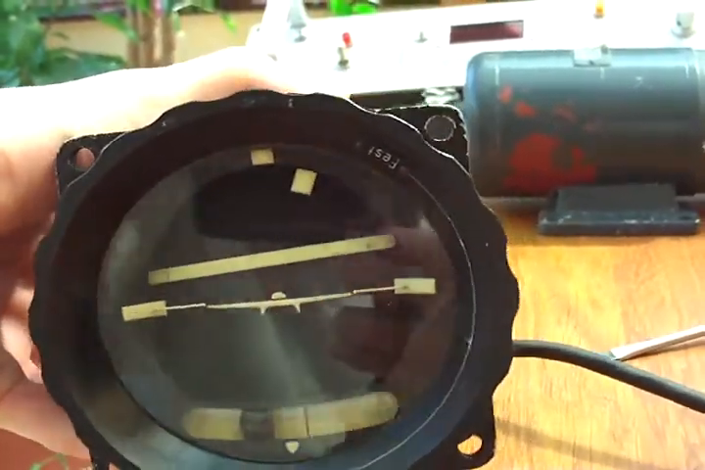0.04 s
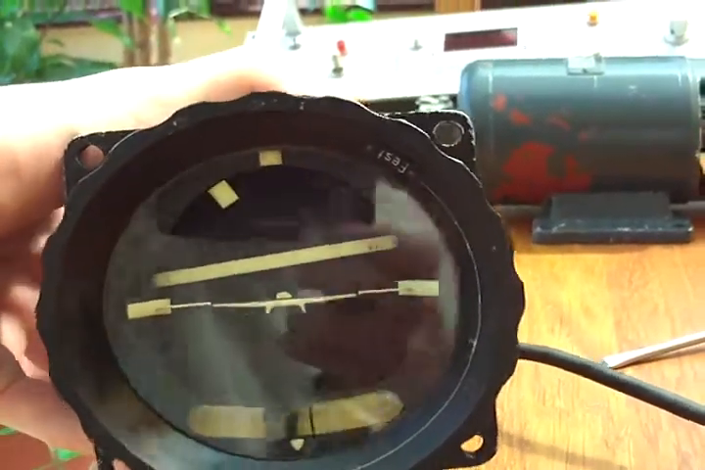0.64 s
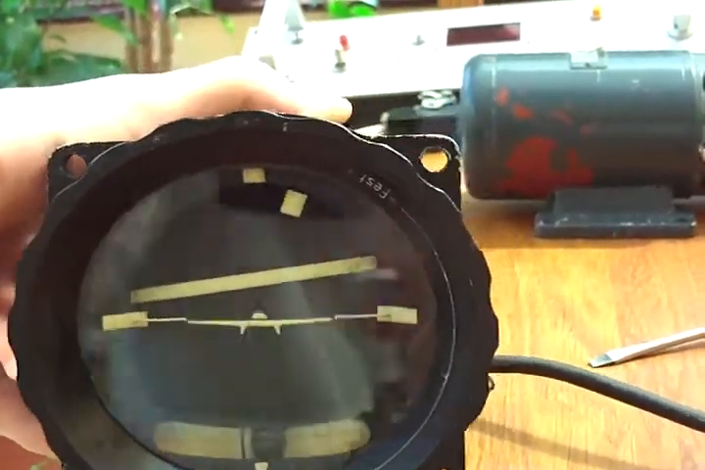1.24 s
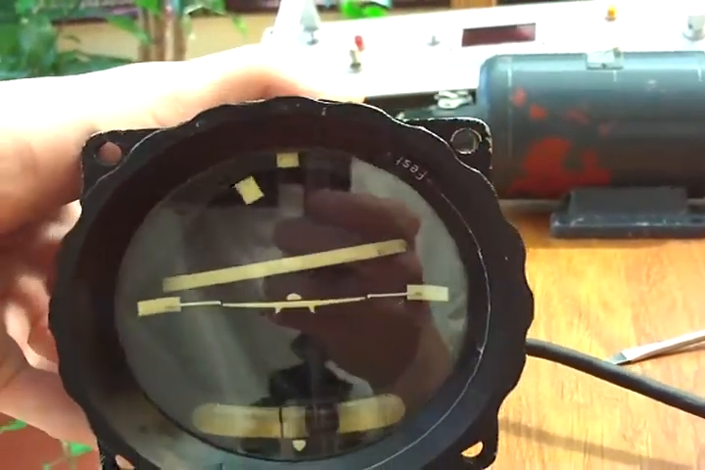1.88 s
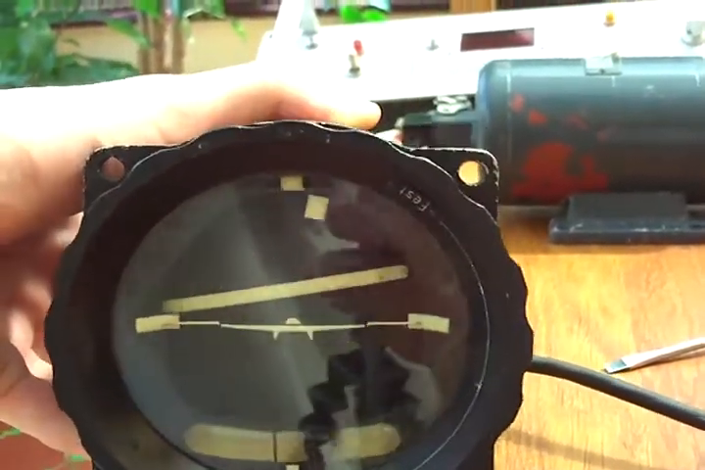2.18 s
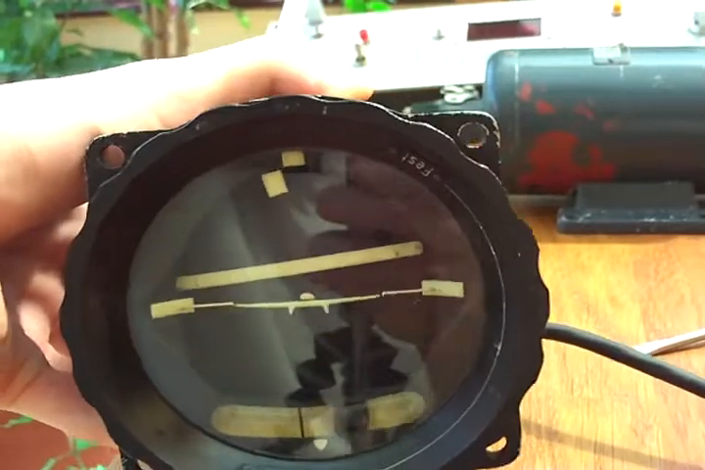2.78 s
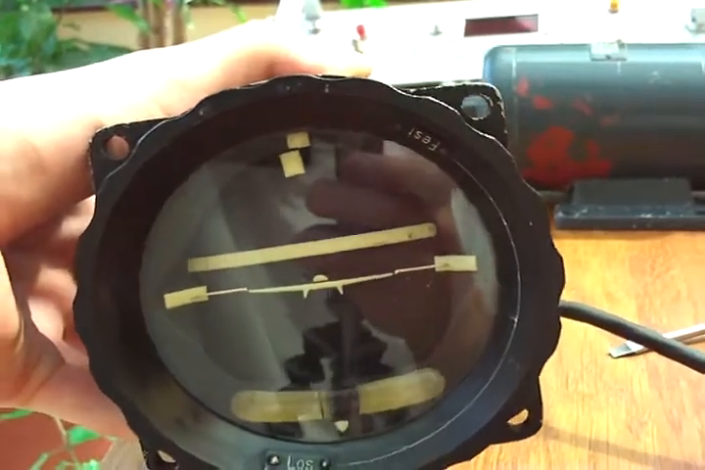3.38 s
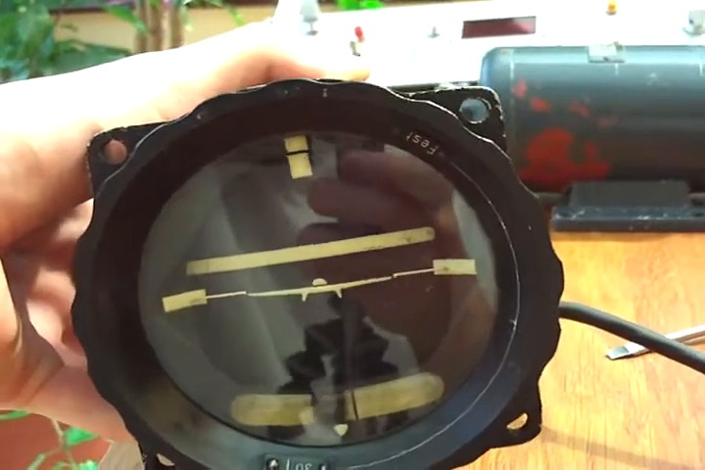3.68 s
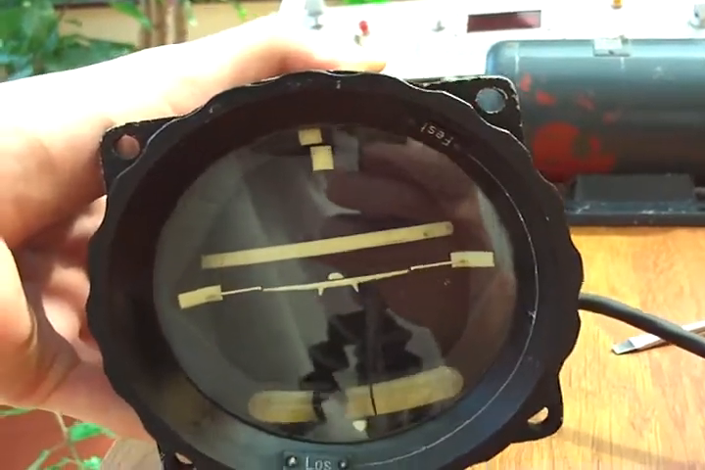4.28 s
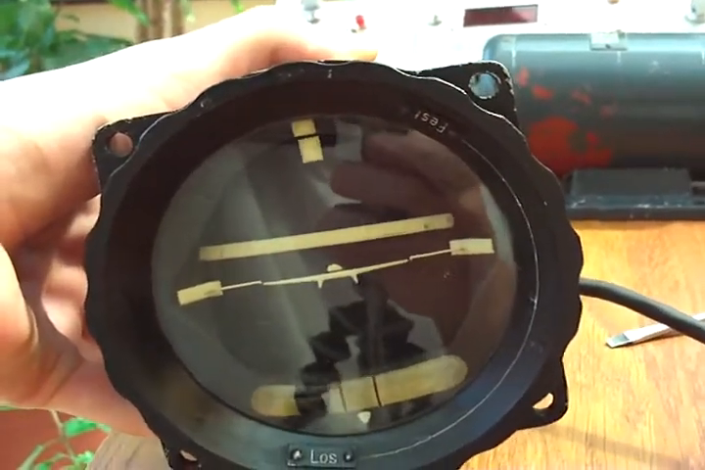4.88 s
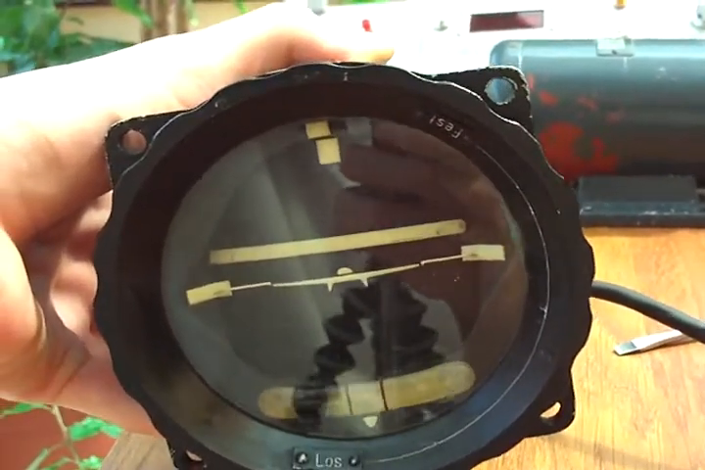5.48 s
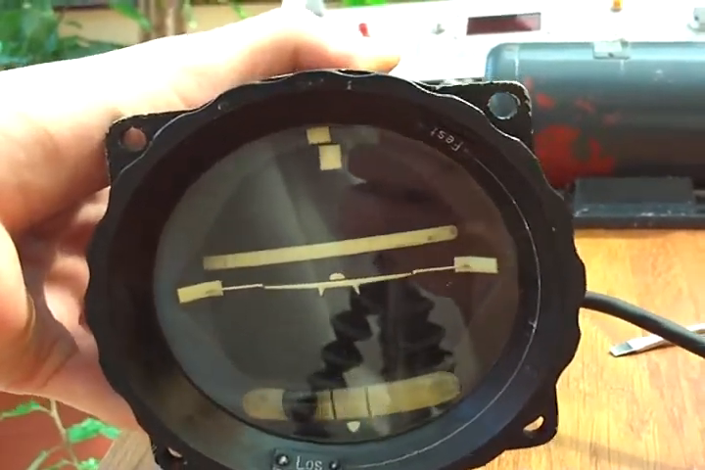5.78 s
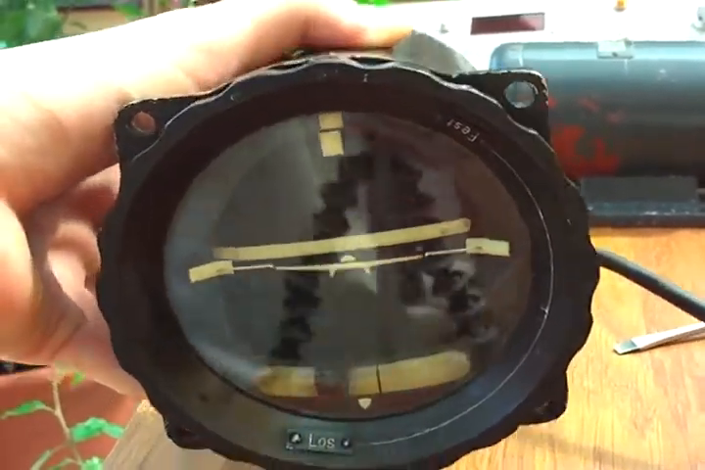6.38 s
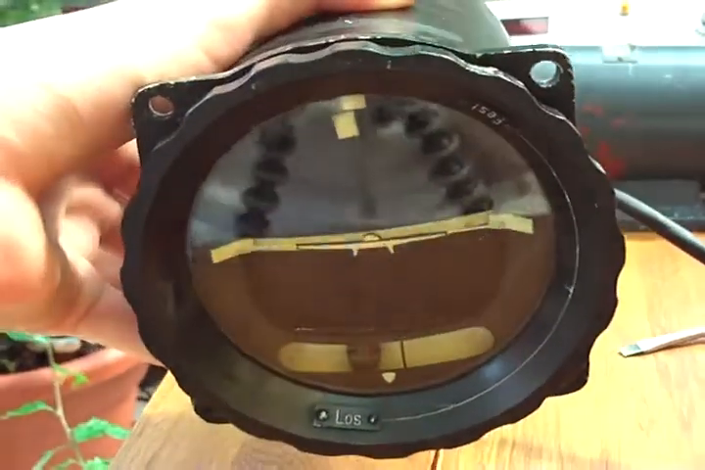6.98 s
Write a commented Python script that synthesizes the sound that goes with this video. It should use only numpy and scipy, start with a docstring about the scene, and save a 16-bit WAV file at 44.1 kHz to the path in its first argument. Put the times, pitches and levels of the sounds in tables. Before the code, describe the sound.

Already spinning at full speed, a gyroscope and its power unit give a steady, pulsing hum with a metallic rolling whirr and a faint high whine, heard close up indoors. At first the whirr comes in quick, hissy surges, which later grow rare. A short low boom rises from a bearing after about two seconds, returns twice, and comes once more at the very end.

```python
"""Close on an aircraft gyro horizon held above a table, in mono; a small rotary converter feeds it.
It is at full speed from the start: the spinning parts hum at about 125 turns a second, their overtones
throb three to four times a second, and rolling bearings fill the metal cases under a thin whine.
For three seconds the bearing noise surges again and again, then the surges grow rare.
A ball race booms at 2.3 s, again around 3.5 and 5.8 s, and once more at the very end."""
import sys
import numpy as np
from scipy import signal
from scipy.fft import rfft, irfft, next_fast_len
from scipy.io import wavfile
from scipy.ndimage import uniform_filter1d

SR = 44100
rng = np.random.default_rng(int(sys.argv[2]) if len(sys.argv) > 2 else 0)


def dump(signal):
    """Clip the signal to [-1, 1] and save it as 16-bit WAV at the path in sys.argv[1]."""
    limited = np.clip(np.atleast_2d(signal).T, -1, 1)
    pcm = np.round(limited * 32767).astype(np.int16)
    wavfile.write(sys.argv[1], SR, pcm)


N = 314874


def from_db(db):
    """Decibels to gain."""
    return 10 ** (np.asarray(db) / 20)


def in_time(rows):
    """A curve of (time_s, value) rows at every sample."""
    return np.interp(np.arange(N) / SR, *np.transpose(rows))


def bump(crest_s, half_s):
    """A smooth swell of height 1."""
    return np.exp(-((np.arange(N) / SR - crest_s) / half_s) ** 2)


def trend(db_per_s):
    """A steady change of level in dB, zero halfway through."""
    return db_per_s * (np.arange(N) - N / 2) / SR


def drift(rate_hz):
    """Slow chance: smoothed noise of spread 1."""
    hop, settle = 100, 2000
    pole = np.exp(-2 * np.pi * rate_hz * hop / SR)
    noise = rng.standard_normal(N // hop + settle + 2)
    slow = signal.lfilter([1], [1, -2 * pole, pole * pole], noise)[settle:]
    return np.interp(np.arange(N) / hop, np.arange(len(slow)), slow / slow.std())


def tone(cycles, level_db, waver, waver_hz):
    """A sine of given rms level; the share `waver` of it wanders in strength and phase."""
    angle = 2 * np.pi * cycles
    in_phase = np.sqrt(2 * (1 - waver ** 2)) + waver * drift(waver_hz)
    quadrature = waver * drift(waver_hz)
    return from_db(level_db) * (in_phase * np.cos(angle) + quadrature * np.sin(angle))


def evened(noise, window_s=0.18):
    """Noise held to a steady level over long stretches; its quick flutter stays."""
    power = noise ** 2
    for _ in range(2):
        power = uniform_filter1d(power, int(window_s * SR))
    return noise * np.sqrt(np.mean(noise ** 2) / (np.abs(power) + 1e-20))


def rotation(turn_hz=124.75):
    """Turns made so far; the speed gives a little as the hand moves the case."""
    # departure from the turning rate: time_s, offset_hz
    speed = [(0, .03), (.5, .17), (1.05, -.14), (1.5, .2), (1.85, .12), (2.08, -.15), (2.7, -.15),
             (3.1, -.04), (3.75, -.03), (4.15, .28), (4.6, .08), (5.25, .07), (5.7, .2), (6.25, -.14),
             (6.65, .06), (7.14, .12)]
    return np.cumsum(turn_hz + in_time(speed)) / SR


def hum(turns, quick_hz=4.245, slow_hz=3.437):
    """Unbalance gives a firm fundamental; side tones at two spacings make the overtones throb."""
    # harmonics of the rotation and their side tones: multiple, quick_steps, slow_steps, level_db
    partials = [(1, 0, 0, -21), (1, -1, 0, -39.5), (1, 1, 0, -49), (2, 0, 0, -24.5), (2, -1, 0, -30),
                (2, -2, 0, -38), (2, 2, 0, -36), (2, 0, -1, -36.5), (2, 0, -2, -37), (2, 0, 1, -44.5),
                (3, 0, 0, -33), (3, -1, 0, -25), (3, 1, 0, -32.5), (3, -2, 0, -44), (3, 0, -1, -38.5),
                (4, 0, 0, -38), (4, -1, 0, -34.5), (4, 1, 0, -28), (4, -2, 0, -44.5), (4, 0, -1, -30),
                (4, 0, -2, -26.5), (5, -1, 0, -32.5), (5, 1, 0, -37.5), (5, 2, 0, -36.5), (5, 0, -1, -33.5),
                (5, 0, -2, -37), (6, 0, 0, -35.5), (6, -1, 0, -37), (7, 0, 0, -26.5), (7, -1, 0, -42.5),
                (7, 0, -1, -38.5), (8, 0, 0, -40), (11, 0, 0, -40), (14, 0, 0, -39)]
    # timing of each overtone's two throbs: multiple, quick_crest_s, slow_crest_s
    throbs = [(2, .141, .243), (3, .007, .233), (4, .059, .104), (5, .063, .098), (6, .19, .34),
              (7, .212, .04)]
    # the quick throb runs a little early or late: time_s, lead_s
    quick_lead = [(0, 0.025), (1.8, -0.015), (3.2, 0.0096), (5.1, -0.019), (6.8, 0.022)]
    t, out = np.arange(N) / SR, np.zeros(N)
    quick_t = t + in_time(quick_lead)
    crests = {multiple: times for multiple, *times in throbs}
    start_cycles = rng.random(size=20)
    for multiple, quick_steps, slow_steps, level_db in partials:
        quick_s, slow_s = crests.get(multiple, (0, 0))
        cycles = start_cycles[multiple] + multiple * turns
        cycles += quick_steps * quick_hz * (quick_t - quick_s)
        cycles += slow_steps * slow_hz * (t - slow_s)
        if quick_steps + slow_steps > 0:
            cycles += 0.68   # upper side tones partly oppose the lower, so a throb wobbles the pitch
        if multiple == 1:
            out += tone(cycles, level_db, waver=0.076, waver_hz=3.4)
        else:
            out += tone(cycles, level_db, waver=0.16, waver_hz=1.6)
    return out


def case_gain(hz):
    """The metal cases colour the bearing noise: a broad slope with narrow modes on it."""
    # broad spectrum of the rolling noise: frequency_hz, density_db
    rolling = [(12, -67), (33, -47.5), (62, -61), (130, -58.5), (230, -60.5), (350, -49.5), (600, -54),
               (1000, -49.5), (1400, -63.5), (2200, -66.5), (3400, -73.5), (4400, -72.5), (5600, -79.5),
               (7100, -98)]
    # resonances and dips of the cases: centre_hz, width_hz, gain_db
    case_modes = [(82, 4.1, 7.5), (163.7, 13, 16), (192.8, 10, 13.5), (244.5, 24, 11), (275, 15, 6),
                  (328.5, 12, 8.5), (419, 12, 3.5), (425, 11, 4.5), (456.7, 10, 9), (481.7, 16, 8),
                  (503, 30, 7.5), (545, 14, 8), (592, 13, 11), (619, 17, 8), (645, 25, 8.5),
                  (700, 16.5, 13), (718, 11, 5.5), (752.6, 15, 10), (871.5, 40, 6), (918, 37, 4),
                  (930, 21, 3.5), (980, 15, 5), (1038, 40, 5), (1263.7, 97, 9.5), (1374, 76, 11),
                  (1485, 42, 8.5), (1733, 285, 9.5), (1930, 33.4, 5), (2980, 67, 0.5), (3730, 91, -3.5),
                  (4250, 480, 3.5)]
    points_hz, density_db = np.transpose(rolling)
    level_db = np.interp(np.log(hz), np.log(points_hz), density_db)
    for centre_hz, width_hz, gain_db in case_modes:
        level_db += gain_db / (1 + (2 * (hz - centre_hz) / width_hz) ** 2)
    return from_db(level_db) * np.sqrt(SR / 2)


def bearing_swells(unsteady_db=0.48):
    """Brief surges of drone, ring, whirr and hiss, in dB around their means."""
    # swells of the bearing noise: crest_s, half_length_s, drone_db, ring_db, whirr_db, hiss_db
    swells = [(.053, .064, -.3, 1, 1.6, 2.5), (.49, .11, -1, 3.7, 3.4, 4), (0.633, .08, 1, 2.3, 2, 3),
              (.775, .063, 0.7, 1.6, 2.4, -1), (.95, .06, .8, .9, .9, .8),
              (1.104, .083, -.4, 4.2, 2.5, 3.5), (1.225, 0.062, 1.5, 5.6, 3.2, 2.5),
              (1.644, .1, -1, 4.2, 5, 7.5), (2.018, .091, -0.7, 4.5, 0.64, 0.8),
              (2.195, 0.074, -0.4, 3.8, 3.5, 2.8), (2.605, 0.05, 0.8, 1.1, 3.7, 1.6),
              (2.801, .11, 1.5, 1.1, 2.3, .5), (3.534, 0.11, 1.5, .8, .8, 1),
              (5.025, 0.16, 1.8, .7, 0.87, 1.4), (6.198, .1, 1.5, 2.3, 0.28, 1.5)]
    level_db = sum(np.outer(swells_db, bump(s, half_s)) for s, half_s, *swells_db in swells)
    return level_db - level_db.mean(axis=1, keepdims=True) + unsteady_db * drift(7.9)


def bearings(turns, once_db=-0.4, twice_db=-0.23, grain_db=0.84):
    """Rolling contact, pressed once and twice a turn, shakes the cases; bands above the rumble surge."""
    angle = 2 * np.pi * turns
    pressure = from_db(once_db * np.cos(angle) + twice_db * np.cos(2 * angle) + grain_db * drift(60))
    contact = pressure * rng.standard_normal(N)
    size = next_fast_len(N)
    hz = np.maximum(np.arange(size // 2 + 1) * SR / size, 1)
    remaining = rfft(contact / contact.std(), size) * case_gain(hz)
    drone_db, ring_db, whirr_db, hiss_db = bearing_swells()
    rumble_db, easing_db = trend(db_per_s=1.0), trend(db_per_s=-0.07)
    # split off from the bottom up, each band follows its own level: upper_edge_hz, level_db
    bands = [(70, rumble_db), (800, drone_db), (1120, ring_db + easing_db),
             (1950, whirr_db + easing_db), (3300, hiss_db)]
    out = np.zeros(N)
    for upper_edge_hz, level_db in bands:
        band = remaining / (1 + (hz / upper_edge_hz) ** 12)
        out += from_db(level_db) * evened(irfft(band, size)[:N])
        remaining = remaining - band
    treble = irfft(remaining, size)[:N]
    return out + from_db(0.72 * hiss_db) * treble   # only part of the hiss swell reaches the top


def whine(turns):
    """Motor slots sing roughly at high multiples of the turning rate."""
    # slot tones: multiple, relative_level_db
    slot_tones = [(23, -52), (24, -48), (25, -60.5), (26, -60), (27, -57.5), (28, -60), (32, -55.5),
                  (45, -61), (48, -64), (53, -74), (54, -69)]
    # the whine fades and returns as the case is turned: time_s, gain_db
    fades = [(0, 3.5), (1.0, 6), (1.8, 4.5), (2.2, 6.5), (3.8, 5.5), (4.2, 5), (5.7, 5), (6.25, 5),
             (7.14, 5.5)]
    lines = sum(tone(multiple * turns + rng.random(), level_db, waver=0.5, waver_hz=26.0)
                for multiple, level_db in slot_tones)
    return from_db(in_time(fades)) * lines


def ball_race():
    """Balls passing round a race add one tone, no multiple of the turning rate, that booms at times."""
    # tone of the race between booms: pitch_hz, level_db
    race_tone = [(164.1, -37.5)]
    # booms of that tone: crest_s, swell_db
    booms = [(2.31, 20), (3.47, 14), (3.681, 11), (5.66, 11), (5.81, 21), (6.04, 17), (7.08, 13)]
    swell_db = sum(boom_db * bump(crest_s, half_s=0.072) for crest_s, boom_db in booms)
    return sum(tone(pitch_hz * np.arange(N) / SR, level_db + swell_db, waver=0.29, waver_hz=2.4)
               for pitch_hz, level_db in race_tone)


def scene():
    """Hum, bearings and whine share one rotation and meet the race tone at a single microphone."""
    turns = rotation()
    mix = from_db(-0.12) * bearings(turns)
    mix += from_db(-0.6) * hum(turns)
    mix += from_db(-0.2) * whine(turns)
    mix += from_db(-2.7) * ball_race()
    return mix[None]


def record(dry, ceiling=0.96, cutoff_hz=7300):
    """The microphone chain rounds the rare highest peaks just under full scale and cuts the top."""
    rounded = dry / (1 + (dry / ceiling) ** 12) ** (1 / 12)
    lowpass = signal.ellip(10, 0.2, 90, cutoff_hz, fs=SR, output="sos")
    return signal.sosfilt(lowpass, rounded)


dry = scene()
out = record(dry)
dump(out)
```